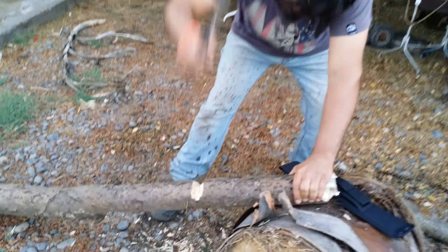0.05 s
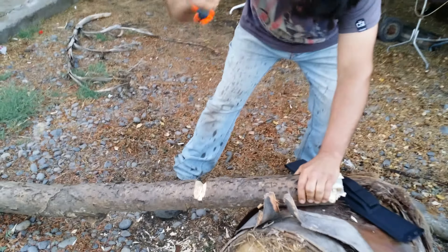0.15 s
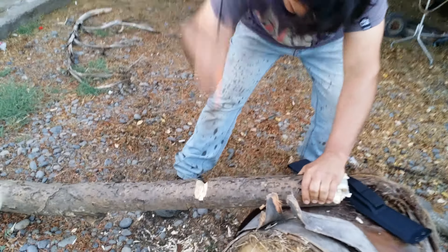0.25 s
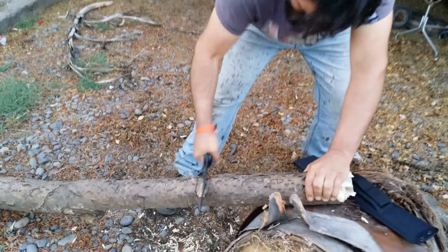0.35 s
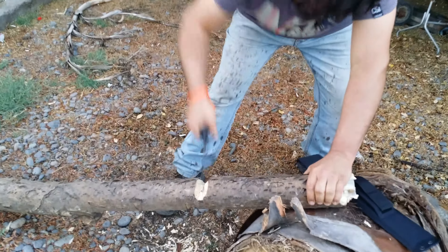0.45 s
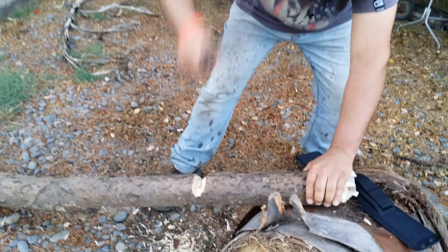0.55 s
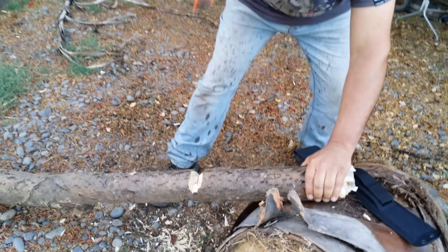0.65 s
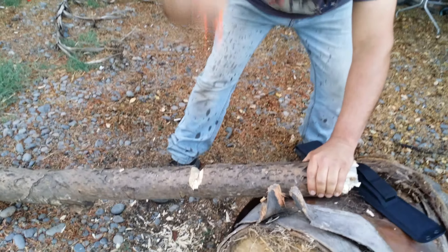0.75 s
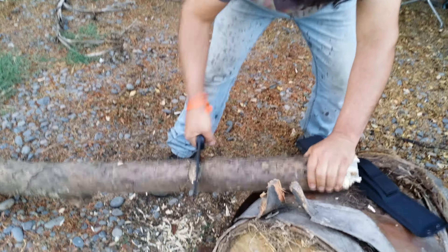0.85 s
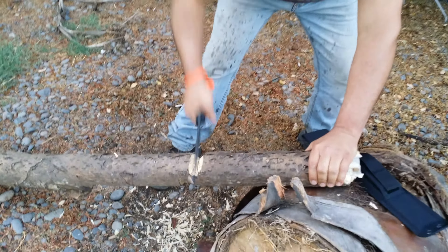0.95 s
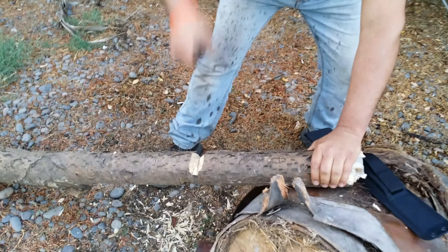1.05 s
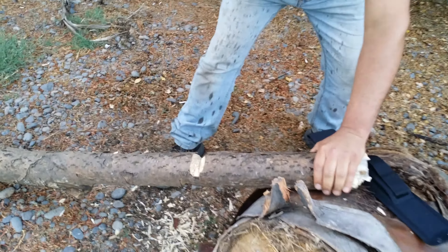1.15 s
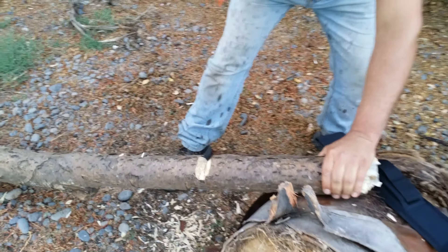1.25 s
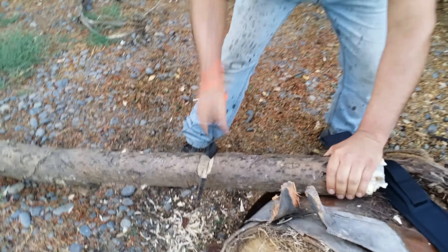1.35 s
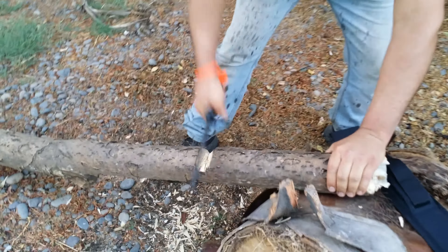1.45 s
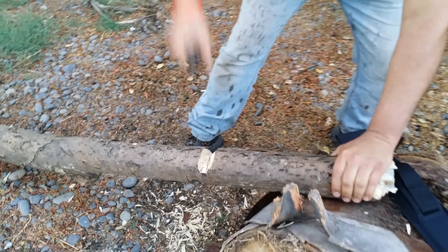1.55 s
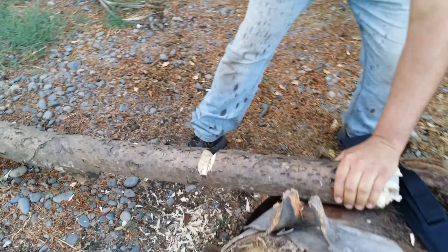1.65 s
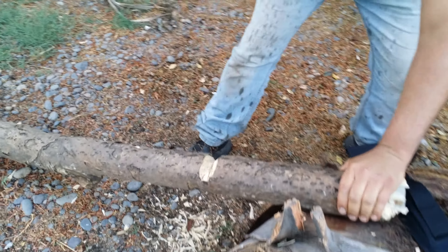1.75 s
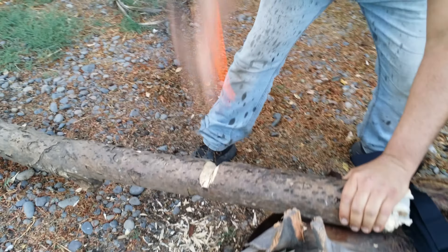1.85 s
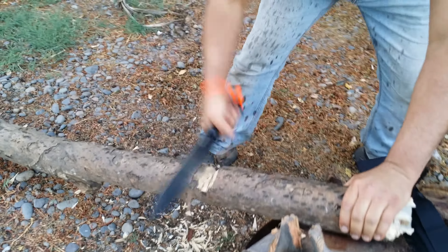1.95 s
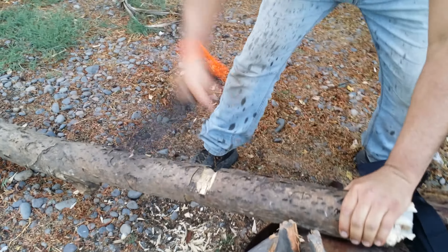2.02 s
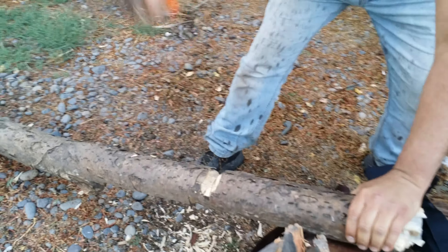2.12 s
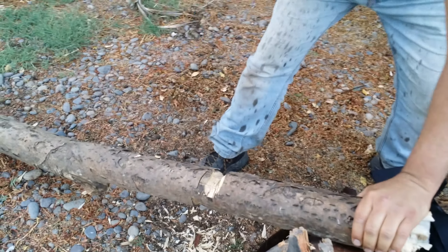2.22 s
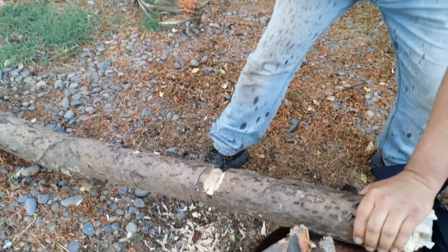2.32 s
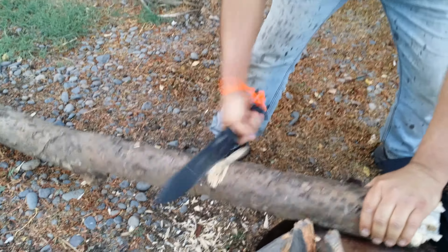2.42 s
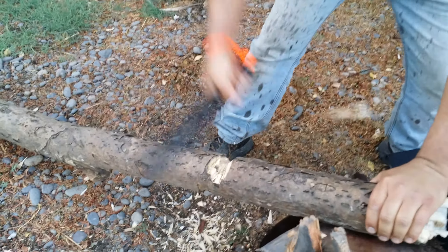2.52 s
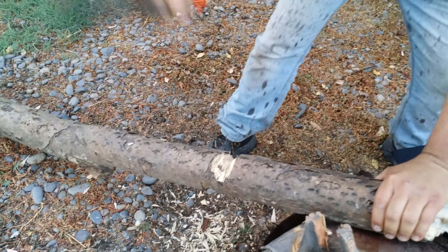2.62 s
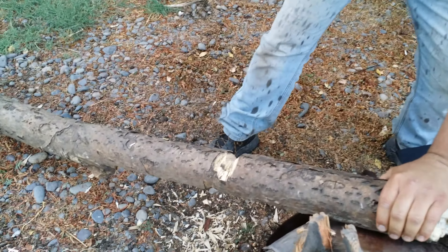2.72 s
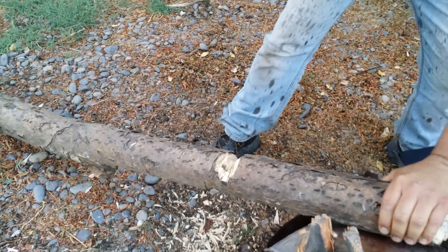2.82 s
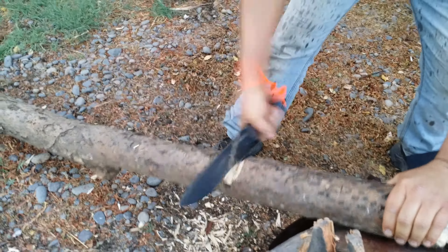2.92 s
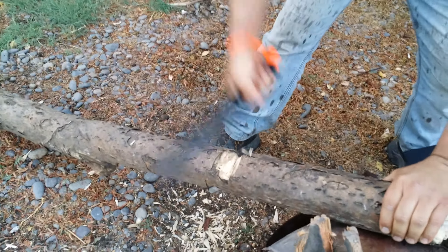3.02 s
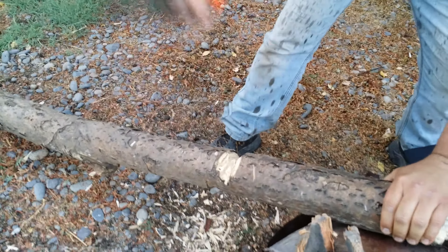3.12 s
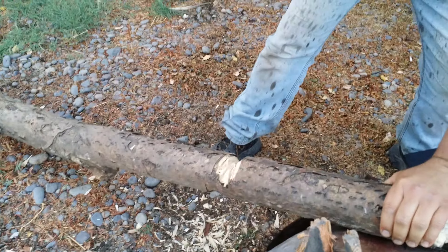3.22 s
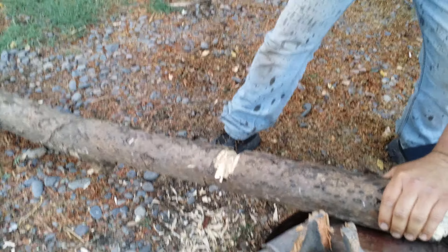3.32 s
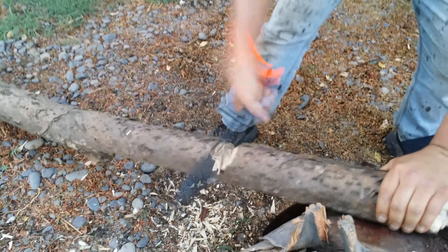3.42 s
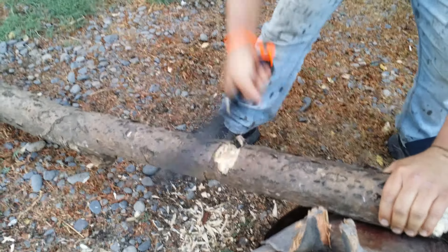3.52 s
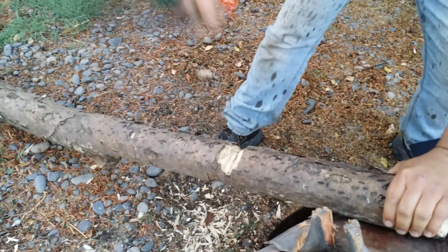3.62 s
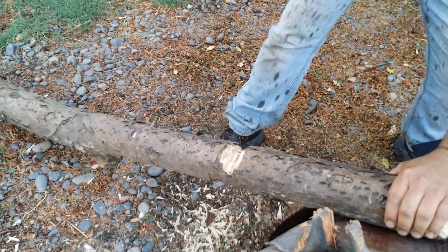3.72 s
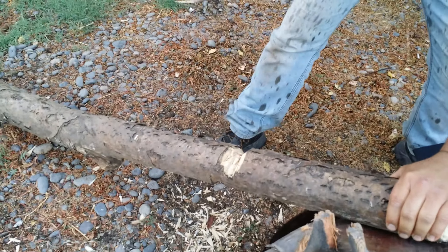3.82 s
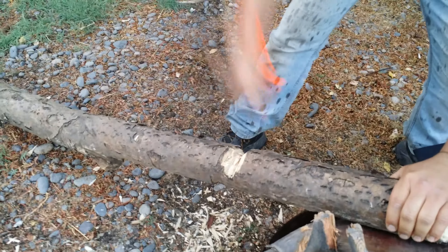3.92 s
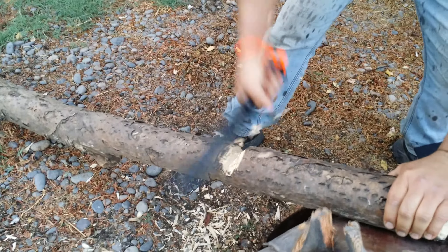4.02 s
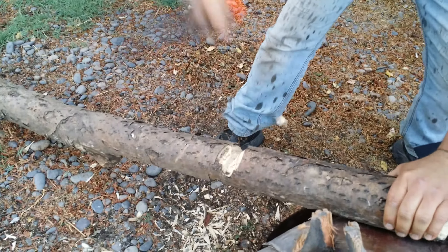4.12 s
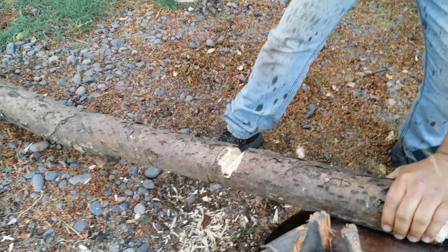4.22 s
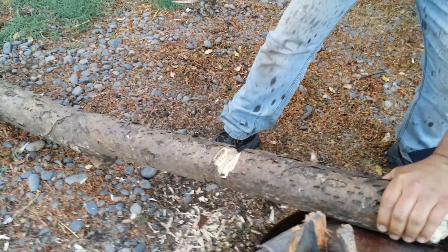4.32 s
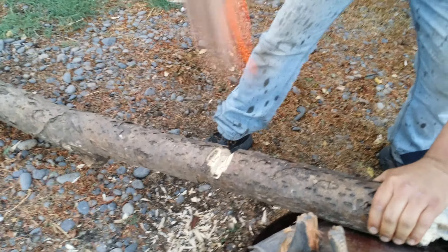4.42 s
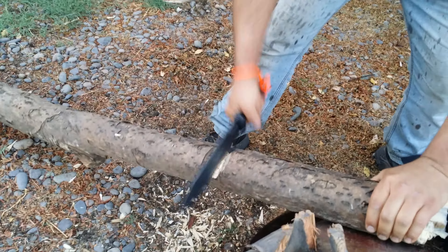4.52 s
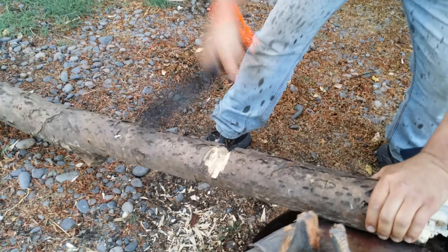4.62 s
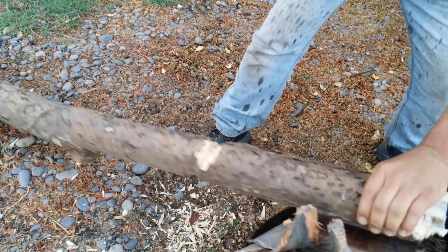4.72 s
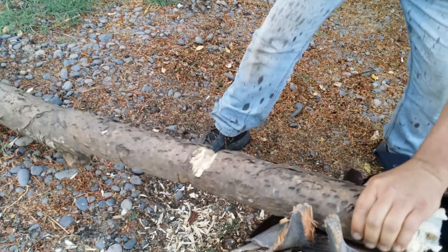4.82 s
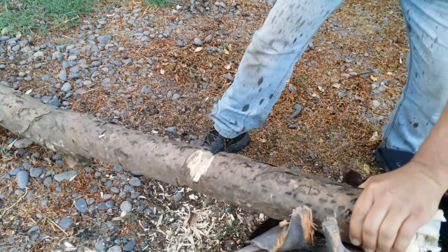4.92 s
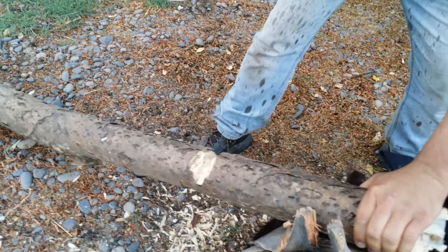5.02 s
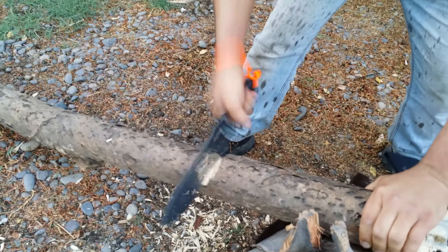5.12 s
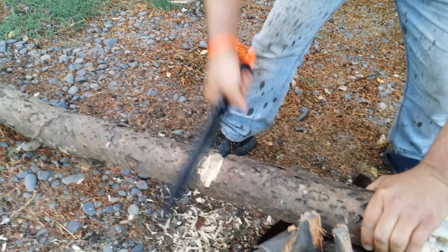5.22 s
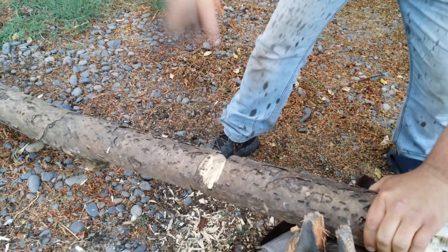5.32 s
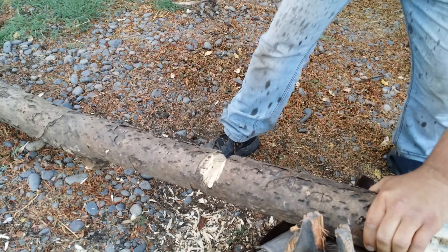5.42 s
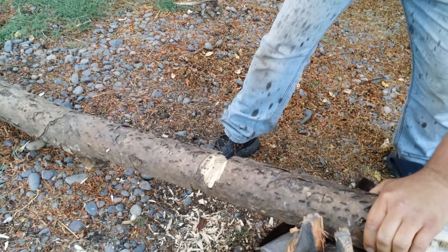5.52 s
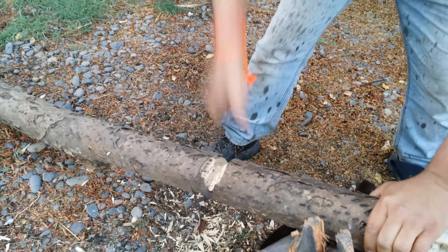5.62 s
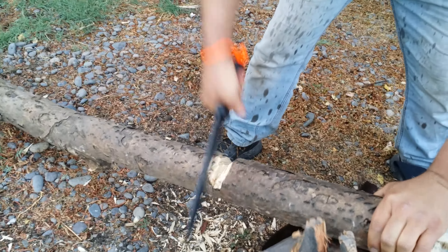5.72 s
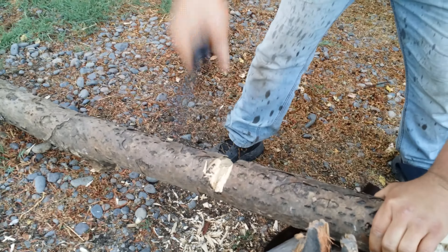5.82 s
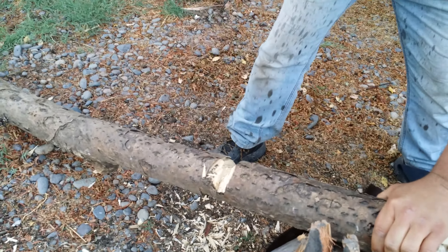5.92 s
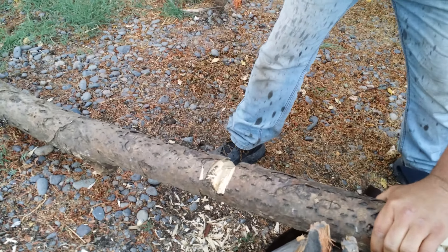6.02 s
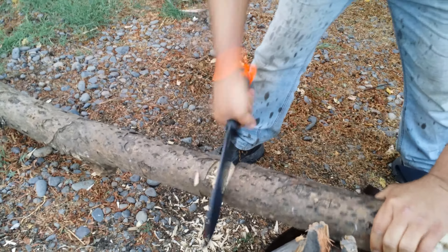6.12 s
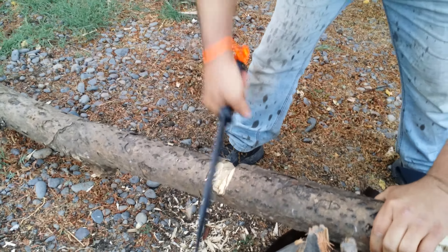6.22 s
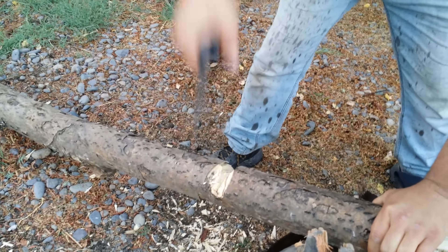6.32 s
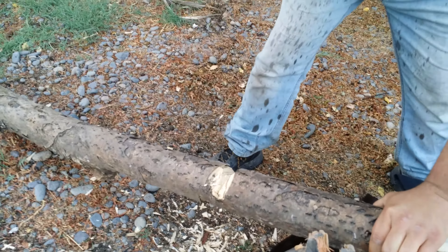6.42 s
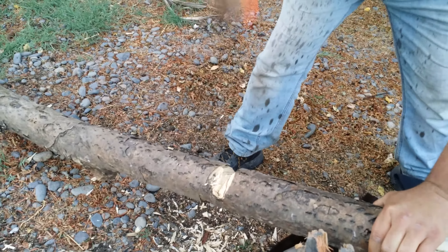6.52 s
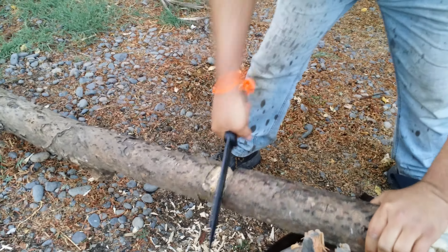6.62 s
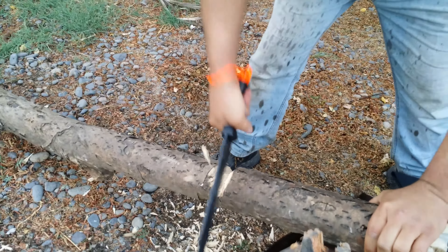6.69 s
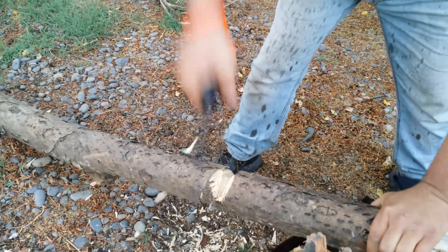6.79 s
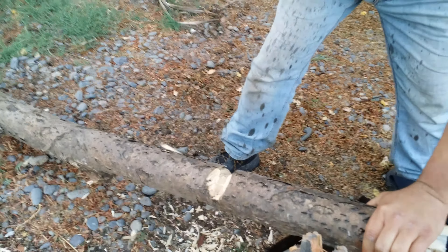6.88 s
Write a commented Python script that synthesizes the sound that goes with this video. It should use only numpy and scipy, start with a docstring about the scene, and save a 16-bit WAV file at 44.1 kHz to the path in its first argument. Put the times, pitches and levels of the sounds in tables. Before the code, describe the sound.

A heavy knife chops a dry branch about twice a second, sharp woody cracks ringing briefly in an open yard, tiny chips ticking on gravel.

```python
"""Chopping a branch in a gravel yard

A heavy knife chops a dry branch held across a stump, about two blows a second: decaying modes ring as wood
and blade, filtered noise grains snap as fibres. Chips and crumbs tick on the gravel as short noise bursts;
the branch bumps on the stump, amid soft rubs, hiss and hazy tails. Walls and a diffuse yard echo answer.
Behind lies coloured-noise air; later a far engine hum, a rising sine with low noise, fades in.
"""
import sys
import numpy as np
from scipy import signal
from scipy.fft import rfft, irfft, next_fast_len
from scipy.io import wavfile

SR = 44100
rng = np.random.default_rng(int(sys.argv[2]) if len(sys.argv) > 2 else 0)


def store_wav(level_fs):
    """Save 16-bit WAV to argv[1]."""
    pcm = np.round(np.clip(np.atleast_2d(level_fs), -1, 1) * 32767)
    wavfile.write(sys.argv[1], SR, pcm.T.astype(np.int16))


N = 306495
LEAD = SR // 4  # samples before time zero
RING = SR // 3  # samples in one blow
TAIL = 2 ** 15  # samples in its echo

# Knife blows. Each row: start in seconds, relative strength in dB, depth of the cut 0-1,
# looseness of the branch on the stump 0-1, gain of the middle modes in dB (how squarely they are struck).
BLOWS = [(-0.1, 1, 0.45, 0.55, -1.5), (0.4156, -1, 0.3, 0.83, 1.5), (0.9394, 0.5, 0.07, 0.82, -1.5),
         (1.4549, 2.5, 0, 0.91, -0.5), (1.9802, -3, 0.75, 0.26, 3), (2.4953, 0, 1, .2, -1.5),
         (3.0028, -1.4, 0.82, 0.06, -3.5), (3.5126, -2.05, 0.97, 0.08, 5), (4.028, 1, 0.16, 0.15, 0.5),
         (4.5525, 0.8, 0.61, 0.13, 4), (5.211, -.7, 0.01, 0.03, 2.5), (5.7243, 2.5, 0.4, 0.05, -7.5),
         (6.2057, 1, 0.11, 0, -1), (6.7012, 2, 0.4, 0.05, -0.5)]


def knife(crunch_db=1.07, ring_wet_db=-6.0):
    """Deep cuts snap longer, with more thud and hiss; a loose branch rings hollow; a square hit knocks harder."""
    # Splitting fibres. Each row: frequency in Hz, gain in dB.
    crack_colour = [(30, -19.5), (150, -11.5), (400, -1), (1200, 3), (2200, 0.5), (3000, -5), (5000, -8),
                    (7200, -7.5), (10000, -12.5), (14000, -15)]
    # A deep cut shoves the branch and tears more splinters. Each row: frequency in Hz, gain in dB
    # when shallow, gain in dB when deep.
    cut_colour = [(80.5, -9.5, 3), (259.3, .5, .5), (990, -1.5, -2.5), (1940, -3, -3.5), (3600, 0.5, 2.5),
                  (8000, -5, 6.5)]
    # Hollow ring of a fully loose branch. Each row: frequency in Hz, gain in dB.
    hollow_colour = [(280, -1), (600, 0), (840, 12), (1200, 11), (2100, 3.5), (3200, -2.5), (8000, 1)]
    knock_hz, knock_ratio = 566, 1.9  # centre of the middle modes, reach to either side
    snap_ms, snap_depth_ms = 1.7, 1.8  # snapping time in a shallow cut, extra in a deep one
    loose_echo_db = 5  # the crack's wash in the yard grows by this many dB at full looseness

    track, bands, echoes = np.zeros((2, LEAD + N)), yard(), walls()
    for start_s, strength_db, depth, loose, knock_db in BLOWS:
        depth, loose = np.clip([depth, loose], 0, 1)
        parts = chop(snap_ms + snap_depth_ms * depth)
        ring, snapping = (np.pad(part, (0, TAIL - RING)) for part in parts)
        near = ring + colour(snapping, crack_colour)
        response = scatter(bands)

        # fibres radiate differently in every direction: their scatter returns as a smooth wash
        wash_gain = np.linalg.norm(snapping) * undb(crunch_db + loose_echo_db * loose)
        wash = colour(response[::-1], crack_colour) * wash_gain
        far = undb(ring_wet_db) * through(ring, response) + wash + through(near, echoes)

        cut = [(hz, shallow + depth * (deep - shallow)) for hz, shallow, deep in cut_colour]
        hollow = [(hz, loose * db) for hz, db in hollow_colour]
        knock = [(knock_hz / knock_ratio, 0), (knock_hz, knock_db), (knock_hz * knock_ratio, 0)]
        blow = ports(near) + far
        for points in (cut, hollow, knock):
            blow = colour(blow, points)
        add(track, start_s, undb(strength_db) * blow)
    return track


def chop(snap_ms, detune=0.012, scatter_db=2.5, crack_db=-3.0, push_db=-21, push_s=0.0027, ring_db=-8.0,
         travel_s=0.0012, sink_share=0.45, contact_s=0.0011, drive=0.94, drive_s=0.0024):
    """One blow: the edge shoves the wood, fibres snap while it sinks in, branch and blade ring on."""
    # Modes of branch and blade. Each row: frequency in Hz, relative level in dB, t60 in seconds.
    modes = [(222, -22.5, 0.17), (272.6, -21, 0.19), (330, -6, 0.065), (360, -9, 0.04),
             (410, -18.5, 0.0072), (516, -13.5, 0.13), (547.3, -7, 0.13), (609.6, -4.5, 0.075),
             (670, -7.5, 0.017), (847.7, -6.5, .1), (900, -17, 0.16), (1007, -19.5, 0.087),
             (1140, -14, .06), (1257, -14, 0.04), (1438, -4.5, .025), (1710, -18, 0.043),
             (2008, -12, 0.031), (2204, -5.5, 0.032), (2370, -10, 0.032), (3104, -15, 0.012),
             (4240, -14.5, 0.012), (6760, -17.5, 0.029)]
    t = np.arange(RING) / SR
    hz, db, t60_s = np.transpose(modes)[:, :, None]
    pitch_chance, level_chance = rng.standard_normal((2, len(modes), 1))

    # the branch takes the blow as the edge sticks; bending waves are slower at low pitch
    sinking_s = sink_share * snap_ms / 1000
    age_s = np.maximum(t - sinking_s - travel_s * np.sqrt(500 / hz), 0)
    build_up = 1 - np.exp(-age_s / contact_s)
    swing = np.sin(2 * np.pi * hz * (1 + detune * pitch_chance) * age_s) * build_up
    # the first swings are the widest, until hand and support soak them up
    first_swings = 1 + drive * np.exp(-(age_s / drive_s) ** 2)
    fade = np.exp(-np.log(1000) * age_s / t60_s) * first_swings
    ring = np.sum(swing * fade * undb(db + scatter_db * level_chance), axis=0)

    push = np.sin(2 * np.pi * t / push_s) * (t < push_s / 2)  # half a sine
    ms = t * 1000
    bite = 1 - np.exp(-ms / 0.25)
    snap_fade = np.exp(-(ms / snap_ms) ** 2) + 0.31 * np.exp(-ms / 6)
    snapping = grains(RING, spread_db=7.0) * bite * snap_fade
    return undb(ring_db) * ring + undb(push_db) * push, undb(crack_db) * snapping


def chips(decay_s=0.0005, skitter=0.054, skitter_s=0.0098):
    """Splinters and crumbs tick on the gravel and skitter briefly."""
    # Larger chips landing. Each row: start in seconds, peak level in dB ahead of the ports, pitch in Hz.
    landings = [(.615, -34.5, 6900), (.7535, -32, 7300), (.836, -39, 7000), (2.152, -39.5, 7340),
                (2.395, -40.5, 1575), (3.157, -30, 5146), (4.3066, -37.5, 7000), (4.336, -41, 8000),
                (4.356, -29.5, 4500), (4.962, -35.5, 8460), (4.995, -35.5, 7660), (5.1756, -41, 7100),
                (5.2395, -16, 9330), (6.1235, -37.5, 8000), (6.238, -25, 7100)]
    # A splinter on gravel. Each row: multiple of its pitch, gain in dB.
    tick_colour = [(.03, -30), (0.152, -13), (0.399, -8.5), (0.998, 3), (1.701, -6), (3, -17)]
    track, t = np.zeros(LEAD + N), np.arange(SR // 10) / SR
    for start_s, peak_db, hz in [*landings, *crumbs()]:
        landing = rng.standard_normal(len(t)) * np.exp(-t / decay_s)
        rolling = grains(len(t), spread_db=4.0) * skitter * np.exp(-t / skitter_s)
        tick = colour(landing + rolling, [(hz * multiple, gain_db) for multiple, gain_db in tick_colour])
        add(track, start_s, tick * undb(peak_db) / np.abs(tick).max())
    return track


def crumbs(count=7):
    """Every blow throws a few crumbs of wood; those that fly longer land farther off, so quieter."""
    # Shortest and longest flight in seconds.
    flight_range_s = (0.02, .48)
    # Lowest and highest pitch in Hz.
    pitch_range_hz = (5000, 9500)
    level_db, fade_db_per_s, spread_db = -45, 27.5, 1.5
    rows = []
    for blow_s, *_ in BLOWS:
        flights_s = rng.uniform(*flight_range_s, count)
        chances = rng.standard_normal(count)
        pitches_hz = rng.uniform(*pitch_range_hz, count)
        for flight_s, chance, hz in zip(flights_s, chances, pitches_hz):
            peak_db = level_db - fade_db_per_s * flight_s + spread_db * chance
            rows.append((blow_s + flight_s, peak_db, hz))
    return rows


def support(decay_s=0.0087, bump_db=11, contacts=3):
    """The branch bumps on the stump, damped by the hand that holds it; soft noise swells rub, hiss and trail."""
    # Drops on the stump. Each row: start in seconds, relative level in dB.
    drops = [(4.3525, -54.5), (4.888, -26), (6.055, -49)]
    # Colour of a bump. Each row: frequency in Hz, gain in dB.
    bump_colour = [(50, -11), (130, -2), (280, 5), (500, -4.5), (780, 1), (1200, -4), (2300, -7.5),
                   (4000, -23), (9000, -27), (14000, -23.5)]
    # Soft rubs, hiss and hazy tails. Each row: centre in seconds, length in seconds, level in dB,
    # centre in Hz, reach of the band to either side as a ratio.
    rubs_and_haze = [(1.35, 0.18, -62.5, 392, 1.7), (1.388, 0.082, -69, 3515, 1.44),
                     (1.72, 0.44, -62, 1880, 1.42), (2.329, .08, -62, 1392, 1.5),
                     (4.755, .14, -53.5, 4340, 3.2), (5.02, .35, -65.5, 2990, 3.2),
                     (5.99, 0.066, -56.5, 520, 1.28)]
    rattle_s, rattle_db = 0.0033, -4  # time and level step from one contact to the next

    track, t = np.zeros(LEAD + N), np.arange(RING) / SR
    for start_s, db in drops:
        for k in range(contacts):
            contact = colour(rng.standard_normal(RING) * np.exp(-t / decay_s), bump_colour)
            add(track, start_s + k * rattle_s, undb(db + bump_db + k * rattle_db) * contact)
    for centre_s, length_s, db, hz, ratio in rubs_and_haze:
        swell = np.exp(-(2 * (np.arange(SR) / SR - 0.5) / length_s) ** 2)
        noise = unit(band(grains(SR, spread_db=8.5), hz, ratio))
        add(track, centre_s - 0.5, undb(db) * swell * noise)
    return track


def walls():
    """A few distinct, dulled echoes."""
    # Each row: delay in seconds, level in dB, low-pass cutoff in Hz.
    reflections = [(.016, -22, 1498), (0.032, -30.5, 7054), (0.059, -29, 680), (0.101, -29.5, 700),
                   (0.127, -39, 7300)]
    echoes = []
    for delay_s, db, cutoff_hz in reflections:
        impulse = np.arange(RING) == int(delay_s * SR)
        b, a = signal.butter(1, min(cutoff_hz, SR / 3), fs=SR)
        echoes.append(undb(db) * signal.lfilter(b, a, impulse))
    return np.sum(echoes, axis=0)[None]


def yard(early_t60_s=0.26, onset_s=0.0016):
    """Echo decay by band: an early scatter and a later tail, each with its own level and decay."""
    # Scatter from ground and fences. Each row: centre in Hz, early level in dB, late level in dB,
    # late t60 in seconds.
    echo_bands = [(119, -15.5, -24.5, 0.91), (287, -6.5, -14, 0.48), (520, -3.5, -12, .55),
                  (880, -16, -21.5, 0.57), (2320, -17.5, -16.5, 0.48), (4500, -16.5, -24.5, 0.23),
                  (8000, -15.5, -18.5, 0.28), (15000, -24, -31, 0.66)]
    t = np.arange(TAIL) / SR
    onset = 1 - np.exp(-(t / onset_s) ** 2)
    centres_hz = [row[0] for row in echo_bands]
    bands = []
    for k, (_, early_db, late_db, late_t60_s) in enumerate(echo_bands):
        share = along(list(zip(centres_hz, np.eye(len(echo_bands))[k])), TAIL)
        early = unit(np.exp(-np.log(1000) * t / early_t60_s) * onset)
        late = unit(np.exp(-np.log(1000) * t / late_t60_s) * onset)
        fade = np.hypot(undb(early_db) * early, undb(late_db) * late) / np.sqrt(TAIL)
        bands.append((share, fade))
    return bands


def scatter(bands):
    """A diffuse echo response from shaped noise, different at the two ports."""
    noise = rfft(rng.standard_normal((2, TAIL)))
    return sum(irfft(noise * share) * fade for share, fade in bands)


def through(x, response):
    """Convolve a sound with an echo response."""
    return signal.fftconvolve(x[None], response, axes=1)[:, :len(x)]


def ports(x):
    """A near source reaches the two microphone ports with different strength and phase."""
    # Each row: frequency in Hz, left minus right in dB.
    level_gap = [(60, 2), (150, -2), (350, -4.5), (550, -4.5), (750, 0), (1000, -6.5), (1500, -0.5),
                 (2000, 3.5), (2600, 3), (4000, 10.5), (7000, 1.5), (9500, -11), (13000, -0.5)]
    # Each row: frequency in Hz, lead of the left in radians.
    phase_gap = [(100, 3), (250, 0.34), (500, 0.35), (700, 1.11), (1000, 0.5), (1500, 0.93), (3000, 1.04),
                 (3800, -1.4), (6000, 1.26), (9000, -2), (12500, -1.5)]
    size = 2 * next_fast_len(len(x))
    half = undb(along(level_gap, size) / 2) * np.exp(0.5j * along(phase_gap, size))
    return irfft(rfft(x, size) * np.array([half, 1 / half]))[:, :len(x)]


def outdoors(side=0.087):
    """Coloured-noise air drifting in level, and a far engine whose hum fades in as it speeds up."""
    # Colour of the air. Each row: frequency in Hz, gain in dB.
    air_colour = [(18, -37), (30, -6.5), (92, 5), (680, -11.5), (837, -6), (1090, -11.5), (2250, -16),
                  (3320, -21.5), (7240, -23.5), (13900, -30), (15000, -31.5)]
    # Level of the air. Each row: time in seconds, level in dB.
    air_level = [(0, -65.5), (2.2, -64.5), (3.8, -70.5), (6.95, -64)]
    idle_hz, rev_start_s = 36, 4.6
    rev_hz, rev_power = 7.2, 1.5  # rev_hz is gained in the first second
    hum_db, hum_swell_s = -63, 1.3

    t = np.arange(N) / SR
    mid, wide = colour(rng.standard_normal((2, N)), air_colour)
    air = unit(mid + side * np.array([wide, -wide]))
    air = air * undb(np.interp(t, *np.transpose(air_level)))

    revving_s = np.maximum(t - rev_start_s, 0)
    hz = idle_hz + rev_hz * revving_s ** rev_power
    rumble = unit(band(rng.standard_normal(N), 70, 2.2))
    hum = np.sin(2 * np.pi * np.cumsum(hz) / SR) + 0.3 * rumble
    return air + hum * undb(hum_db) * np.minimum(revving_s / hum_swell_s, 1)


def undb(db):
    """Decibels to gain."""
    return 10 ** (np.asarray(db) / 20)


def unit(x):
    """Scale to rms 1."""
    return x / np.sqrt(np.mean(x ** 2))


def along(points, size):
    """Join (Hz, value) points on a log axis, at the bins of a spectrum of this size."""
    hz, value = np.transpose(points)
    return np.interp(np.log(np.fft.rfftfreq(size, 1 / SR) + 1), np.log(hz), value)


def colour(x, points):
    """Causal minimum-phase filter through (Hz, dB) points, by folding the cepstrum."""
    size = 2 * next_fast_len(x.shape[-1])
    cepstrum = irfft(np.log(undb(along(points, size))))
    cepstrum[1:size // 2] *= 2
    cepstrum[size // 2 + 1:] = 0
    return irfft(rfft(x, size) * np.exp(rfft(cepstrum)))[..., :x.shape[-1]]


def band(x, hz, ratio):
    """Band-pass from hz / ratio to hz * ratio."""
    edges_hz = np.clip([hz / ratio, hz * ratio], 10, SR / 2 - 500)
    return signal.sosfilt(signal.butter(2, edges_hz, "band", fs=SR, output="sos"), x)


def add(track, start_s, x):
    """Mix a sound in at a time; tracks begin LEAD samples before time zero."""
    i = int(np.clip(LEAD + start_s * SR, 0, track.shape[-1]))
    track[..., i:i + x.shape[-1]] += x[..., :track.shape[-1] - i]


def grains(size, spread_db):
    """Dense tiny snaps of uneven strength, rms 1."""
    return unit(rng.standard_normal(size) * undb(spread_db * rng.standard_normal(size)))


def scene(small_echo_db=-3):
    """Blows, chips and the shifting branch, close by in the yard, over the outdoor background."""
    small = chips() + support()
    small_echo = undb(small_echo_db) * through(small, scatter(yard()))
    close = knife() + ports(small) + small_echo
    return close[:, LEAD:] + outdoors()


def record(dry, ceiling=1.0):
    """The microphone loses the highest treble; the recorder rounds the loudest peaks and cuts the top."""
    mic_hz, top_hz = 14600, 16600
    heard = signal.sosfilt(signal.ellip(8, 0.2, 60, mic_hz, fs=SR, output="sos"), dry)
    rounded = ceiling * np.tanh(heard / ceiling)
    return signal.sosfilt(signal.ellip(8, 0.2, 70, top_hz, fs=SR, output="sos"), rounded)


dry = scene()
out = record(dry)
store_wav(out)
```